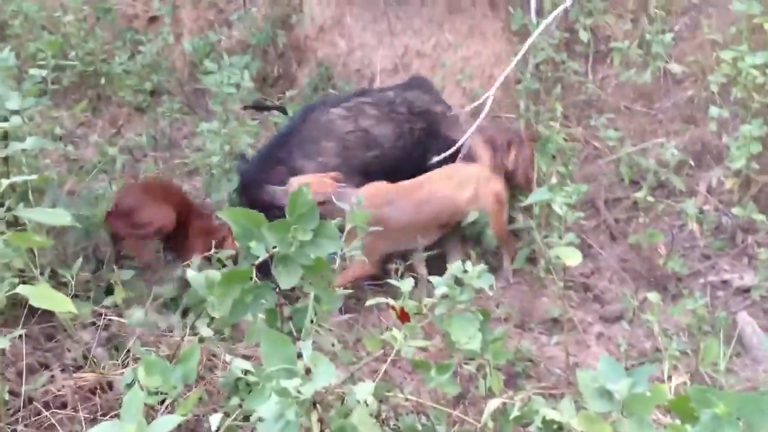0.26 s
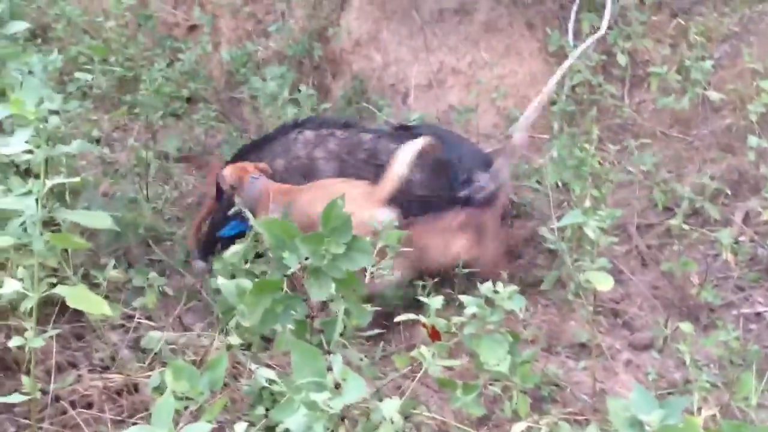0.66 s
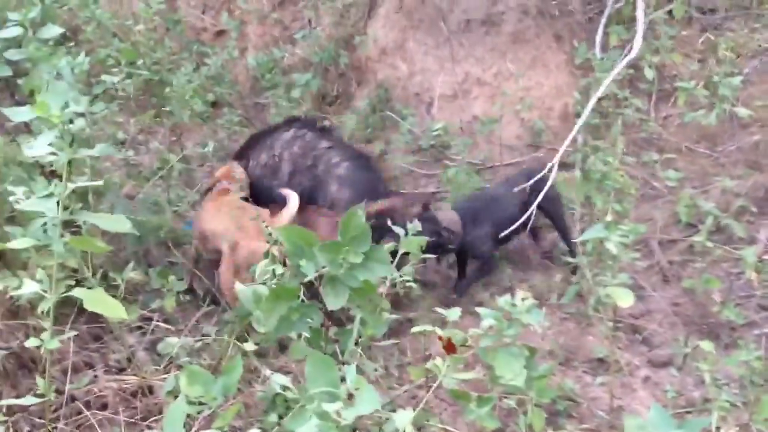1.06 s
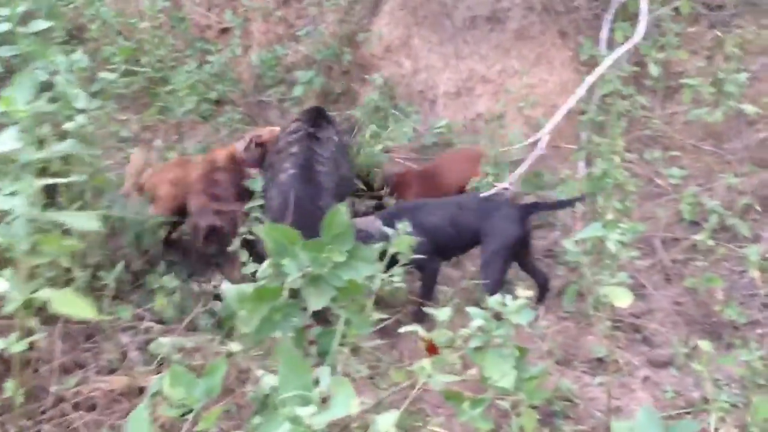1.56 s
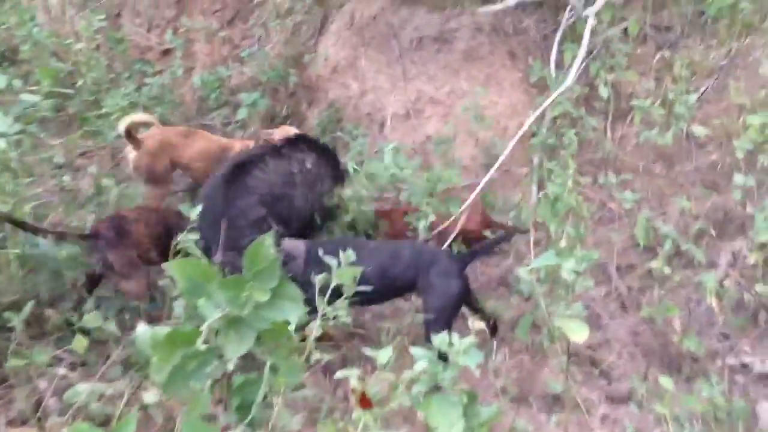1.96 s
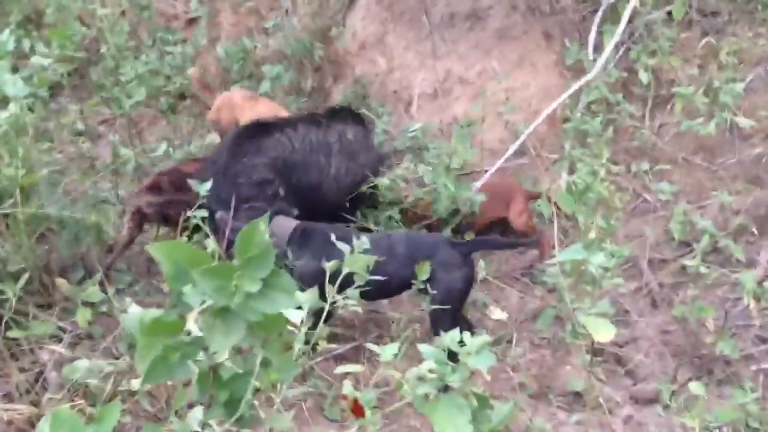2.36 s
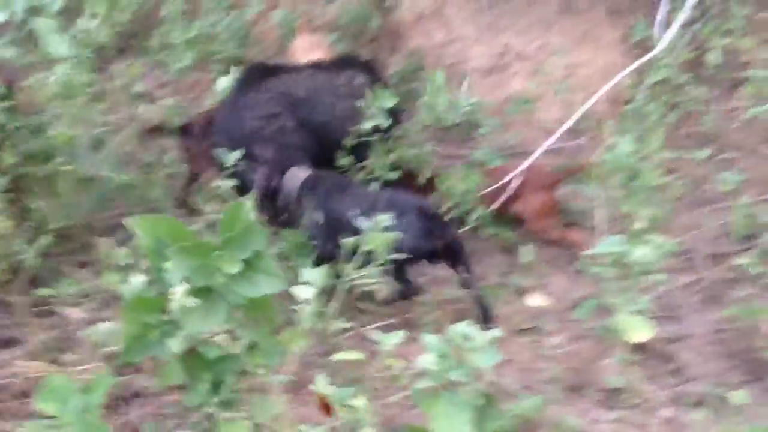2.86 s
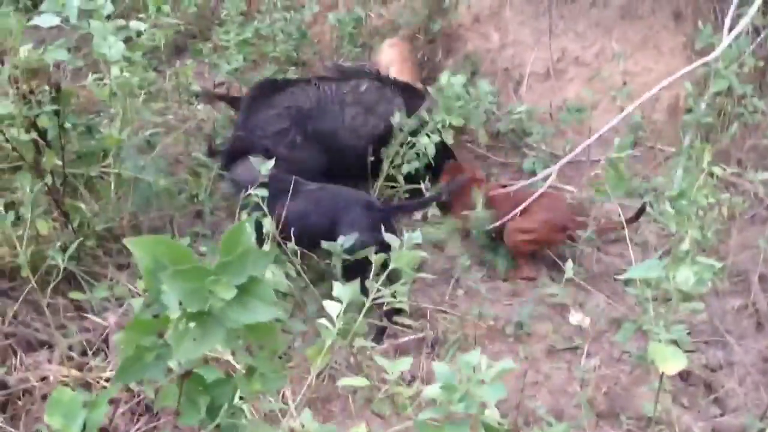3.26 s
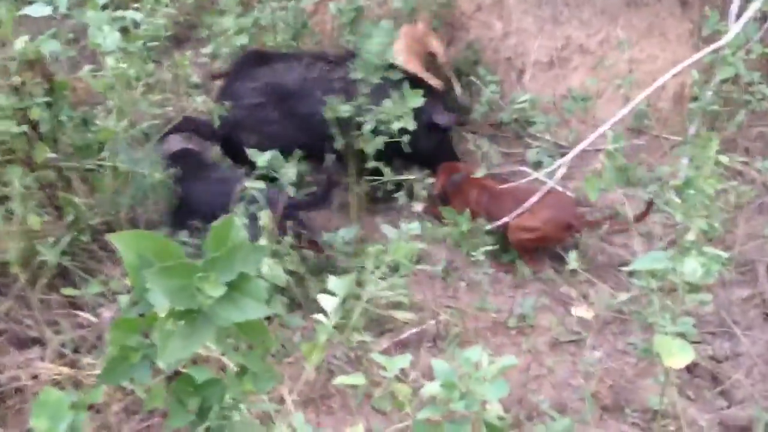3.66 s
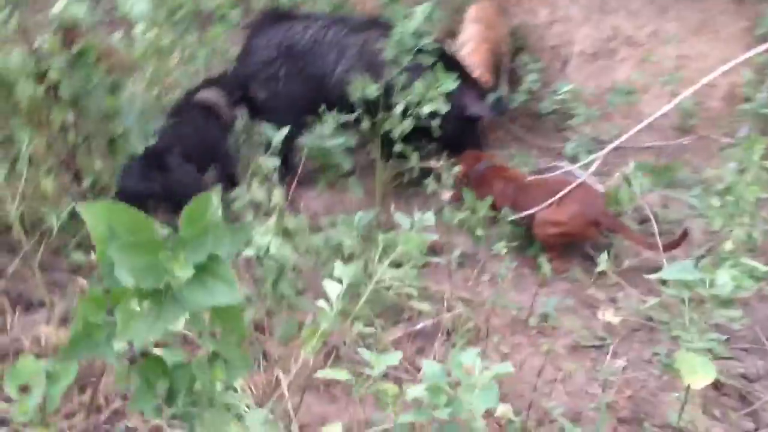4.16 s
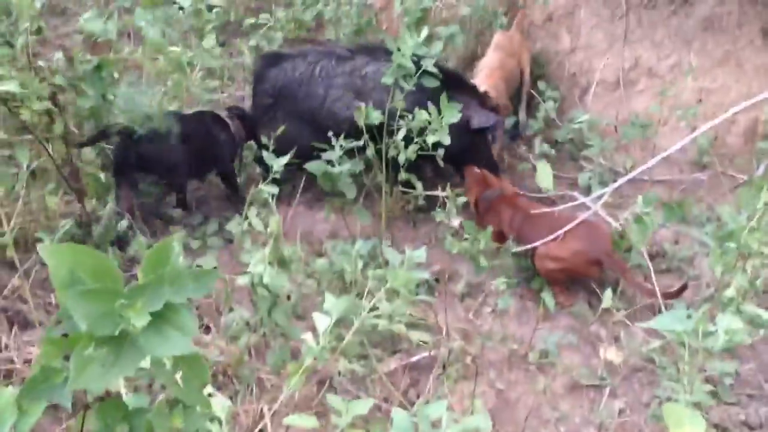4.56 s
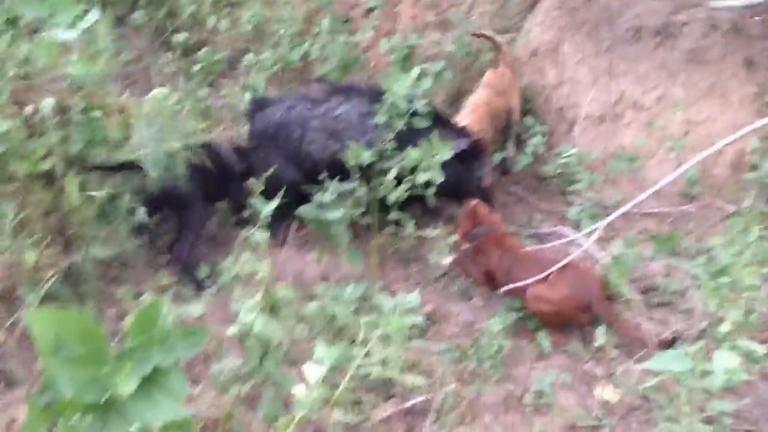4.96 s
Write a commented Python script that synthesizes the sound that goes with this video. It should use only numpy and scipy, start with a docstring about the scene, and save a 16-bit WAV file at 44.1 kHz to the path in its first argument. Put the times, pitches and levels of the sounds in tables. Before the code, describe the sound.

Outdoors, fairly close and dry: paws rustle and crackle through leaves over a soft hiss. A dog whines high and nearly pure, flickering and breaking up, strongest and longest early on, then thinning out. Short half-voiced huffs and toneless grumbles come from the struggle. Twigs crack, more sharply in the second half, before two rough, strained cries close the scene with only a faint echo.

```python
"""Dogs and a hog in dry brush

Hunting dogs hold a feral hog at bay a few metres away. A dog whines in thin cries, built from a gliding
whistle and its overtones. Huffs, grumbles and two late, hoarse cries are rough pulses and puffs of air
shaped by chest and throat. Paws shuffle through leaves and snap twigs, made from filtered noise and ticks,
over a quiet outdoor hiss. A faint echo follows the animals and the twigs."""
import sys
import numpy as np
from scipy import signal
from scipy.fft import rfft, irfft
from scipy.io import wavfile
from scipy.ndimage import uniform_filter1d

SR = 44100
rng = np.random.default_rng(int(sys.argv[2]) if len(sys.argv) > 2 else 0)


def unload_wav(signal):
    """Save mono or channel-first audio to the path in sys.argv[1] as 16-bit WAV at rate SR, clipped to [-1, 1]."""
    wavfile.write(
        sys.argv[1],
        SR,
        np.round(np.clip(np.atleast_2d(signal).T, -1, 1) * 32767).astype(np.int16),
    )


N = 229626
T = np.arange(N) / SR  # time of every sample, in seconds
TAPS = 4096  # length of the colouring filters, in samples
HZ = np.fft.rfftfreq(TAPS, 1 / SR)

# tone of a chest, shared by huffs, grumbles and cries: (frequency [Hz], level [dB])
CHEST = [(70, -38.5), (115, -10.5), (165, 2.5), (275, 3), (345, -12), (600, -57)]


def amp(db):
    """Turns decibels into a plain gain."""
    return 10 ** (np.asarray(db) / 20)


def unit(x):
    """Scales a sound to an average strength (rms) of 1."""
    return x / np.sqrt(np.mean(x ** 2) + 1e-20)


def noise():
    """White noise: a plain hiss with all pitches equally strong."""
    return rng.standard_normal(N)


def wander(rate_hz):
    """Smooth random drift, up to a given rate; rms 1."""
    lowpass = signal.butter(3, rate_hz, fs=SR, output="sos")
    return unit(signal.sosfilt(lowpass, noise()))


def shiver(rate_hz):
    """Quick random trembling around a rate, with no slow drift; rms 1."""
    band = signal.butter(2, [rate_hz / 2, rate_hz * 2], "bandpass", fs=SR, output="sos")
    return unit(signal.sosfilt(band, noise()))


def swell(start, length, rise, fall):
    """The loudness of one event: it rises, holds and dies away (all in seconds)."""
    before = np.minimum(T - start, 0)
    after = np.maximum(T - start - length, 0)
    return np.exp(-(before / rise) ** 2 - after / fall)


def follow(rows, fade=0.012):
    """Gives a gate over the time span of a table, then each further column as a curve."""
    times, *columns = np.transpose(rows)
    to_nearest_end = np.minimum(T - times[0], times[-1] - T)
    gate = np.clip(to_nearest_end / fade + .5, 0, 1)
    return [gate] + [np.interp(T, times, column) for column in columns]


def colour(x, points):
    """Resonances that give a sound a spectrum of (Hz, dB) points, with the least delay; rms 1."""
    hz, db = np.transpose(points)
    log_gain = np.log(amp(np.interp(np.log(HZ + 1), np.log(hz), db)))
    cepstrum = irfft(log_gain)
    # keeping one half of the cepstrum puts the filter's energy as early as possible
    taps = irfft(np.exp(rfft(2 * cepstrum * (np.arange(TAPS) < TAPS // 2))))
    return unit(signal.oaconvolve(x, unit(taps))[:N])


def resonate(x, hz, width):
    """One resonance with a gain of 1 at its centre, which may move along a curve."""
    turn = np.exp(2j * np.pi * np.cumsum(hz * np.ones(len(x))) / SR)
    r = np.exp(-np.pi * width / SR)
    # shift the centre down to zero, smooth, then shift back up
    smooth = signal.lfilter([1 - r], [1, -r], x / turn + 1e-18)
    return 2 * (turn * smooth).real


def formant(x, hz, width):
    """A steep throat resonance, made of three equal ones in a row; rms 1."""
    return unit(resonate(resonate(resonate(x, hz, width), hz, width), hz, width))


def folds(pitch_hz, rough, jitter, shimmer_db):
    """Uneven pulses of slack vocal folds, mixed with air that escapes in puffs each cycle."""
    rough = np.clip(rough, 0, 1)
    turns = np.cumsum(pitch_hz * (1 + jitter * rough * shiver(70))) / SR
    pulses = unit(np.diff(np.floor(turns), prepend=0) - pitch_hz / SR)
    puffs = unit((.3 + np.exp(-(turns % 1) / .35)) * noise())
    drive = ((1 - rough) * pulses + rough * puffs) * amp(shimmer_db * rough * shiver(95))
    return drive / np.sqrt(uniform_filter1d(drive ** 2, size=1100))  # steady air pressure over a few cycles


def leaves():
    """Trampled leaves: a soft wash with tiny crackles, swelling with each scuffle, under a steadier crisp hiss."""
    # scuffling paws: (start [s], length [s], level [dB])
    scuffles = [(0.095, 0.28, -49), (0.447, 0.28, -45), (0.772, 0.071, -41.5), (0.917, 0.27, -52),
                (1.525, 0.48, -48), (2.1, .12, -48.5), (2.38, 0.2, -47.5), (2.756, 0.085, -45.5),
                (3.053, 0.06, -53.5), (3.205, 0.11, -54), (3.45, 0.25, -49), (3.805, 0.089, -52),
                (4.188, 0.19, -51.5), (4.615, 0.16, -49.5), (5.063, 0.092, -47)]
    # tone of the trampled leaves: (frequency [Hz], level [dB])
    leaf_tone = [(120, -24.5), (200, -18), (330, -15), (500, -7), (1000, -12), (1350, -11), (1650, -3),
                 (2270, -6.5), (2700, -9), (3400, -10), (4800, -11), (6800, -19.5), (9500, -29),
                 (12400, -65.5)]
    # tone of the crisp treble: (frequency [Hz], level [dB])
    crisp_tone = [(5000, -36.5), (7500, -8.5), (10000, -3.5), (12500, -1), (15500, 0.5)]
    stir_db, stir_swing_db = -52, 1.47  # the brush never stops stirring
    crisp_db, crisp_swing_db = -59, 1.5
    ticks_per_s = 600
    power = amp(stir_db) ** 2
    for start, length, db in scuffles:
        power = power + (amp(db) * swell(start, length, rise=.035, fall=.045)) ** 2
    stir = np.sqrt(power) * amp(stir_swing_db * wander(17))
    tick_size = amp(3.5 * np.minimum(rng.exponential(1, N), 3.5))  # few are large
    ticks = np.sign(noise()) * (rng.random(N) < ticks_per_s / SR) * tick_size
    grain = rng.standard_normal(120) * np.exp(-np.arange(120) / 30)
    crackle = unit(signal.oaconvolve(ticks, grain)[:N])
    body = stir * colour(noise() + 0.14 * crackle, leaf_tone)
    crisp = colour(noise() + 0.33 * crackle, crisp_tone)
    return body + amp(crisp_db + crisp_swing_db * wander(8.9)) * crisp


def twigs():
    """Dry stems tick at random times: tiny bursts of noise, most of them small, in one wide band."""
    ticks_per_s, level_db, decay_s = 10, -69, .0012
    tick_size = amp(4 * np.minimum(rng.exponential(1, N), 3))
    ticks = (rng.random(N) < ticks_per_s / SR) * tick_size
    bursts = signal.lfilter([1], [1, -np.exp(-1 / (decay_s * SR))], ticks)
    return amp(level_db) * unit(resonate(bursts * noise(), 4500, 5000))


def snaps():
    """Twigs crack and paws land, each a brief burst of noise that dies away in its own band."""
    # snaps and thuds underfoot: (start [s], level [dB], centre [Hz], width [Hz], decay [s])
    cracks = [(.018, -38, 3480, 2500, 0.019), (0.46, -39, 4590, 5000, 0.003),
              (0.825, -41.5, 4000, 5000, 0.0029), (1.402, -39, 4470, 4000, 0.002),
              (1.794, -44, 7230, 8900, .002), (3.099, -45, 4000, 7000, 0.0091),
              (3.439, -37, 12100, 4420, 0.0071), (3.44, -41.5, 2980, 4120, 0.0055),
              (3.855, -51, 12600, 6060, 0.0037), (3.906, -46.5, 5780, 6940, 0.022),
              (3.923, -51, 8000, 5930, 0.0062), (3.934, -45, 390, 248, 0.023),
              (4.1, -38.5, 670, 720, 0.0031), (4.103, -44, 2820, 4940, 0.0038),
              (4.165, -31, 3500, 1980, 0.0042), (4.756, -35, 4300, 7210, 0.0031)]
    out = np.zeros(N + SR)
    t = np.arange(SR // 10) / SR
    for start, db, hz, width, decay in cracks:
        burst = rng.standard_normal(len(t))
        crack = unit(resonate(resonate(burst, hz, width), hz, width))
        out[round(start * SR):][:len(t)] += amp(db) * crack * np.exp(-t / decay)
    return out[:N]


def growl():
    """Low, nearly toneless grumbling: slack folds sound chest and throat in bouts over a faint growl."""
    # grumbles in the tussle: (start [s], length [s], chest level [dB], throat level [dB])
    grumbles = [(0.103, 0.15, -48.5, -55.5), (0.676, 0.034, -56, -75), (1.5, .06, -48, -67.5),
                (1.571, 0.04, -43.5, -45.5), (1.636, 0.034, -44.5, -39.5), (1.759, 0.1, -53.5, -77),
                (3.034, 0.035, -62, -48.5), (3.222, .18, -54.5, -57), (3.566, 0.13, -43.5, -53.5),
                (3.688, 0.14, -52, -53.5), (4.07, 0.024, -56, -63), (4.151, 0.074, -73, -53.5),
                (4.482, .02, -46, -65)]
    # tone of the growling throat: (frequency [Hz], level [dB])
    growl_tone = [(300, -23.5), (400, -12), (540, -2.5), (760, 1), (960, 6), (1250, -4.5), (1600, -18),
                  (3000, -61)]
    mutter_chest_db, mutter_throat_db, mutter_swing_db = -62.5, -62, -1.5
    chest = amp(mutter_chest_db + mutter_swing_db * wander(21))
    throat = amp(mutter_throat_db + mutter_swing_db * wander(10))
    for start, length, chest_db, throat_db in grumbles:
        bout = swell(start, length, rise=.015, fall=.018)
        chest = np.maximum(chest, amp(chest_db) * bout)
        throat = np.maximum(throat, amp(throat_db) * bout)
    drive = folds(105, rough=.7, jitter=.25, shimmer_db=3)
    return chest * colour(drive, CHEST) + throat * colour(drive, growl_tone)


def huffs():
    """Short, gruff, half-voiced puffs through chest and throat; the pitch sags through each one."""
    # the dog's huffs: (peak time [s], rise [s], decay [s], level [dB], throat against chest [dB],
    # pitch at the peak [Hz], roughness [0-1])
    puffs = np.array([(0.803, 0.01, 0.016, -33, -9.5, 144.5, 0.31),
                      (2.049, .011, 0.014, -34, -6, 142.1, 0.3),
                      (2.796, 0.0094, 0.016, -26.5, 2.5, 170.9, 0.17),
                      (3.575, 0.0051, 0.013, -34, -10, 263.3, 0), (3.651, 0.048, 0.028, -44, 0, 201.6, 0.5),
                      (3.741, 0.013, 0.054, -41, 4, 210, 0.5), (4.784, 0.024, 0.015, -49.5, 7, 207.7, 0.4)])
    # tone of the dog's throat: (frequency [Hz], level [dB])
    throat_tone = [(330, -50), (420, 1.5), (520, 9.5), (650, 0.5), (780, 4.5), (1000, -8.5), (1600, -15),
                   (2200, -11), (3000, -21.5), (5000, -20.5), (9000, -56.5), (14000, -70.5)]
    halfway = (puffs[1:, 0] + puffs[:-1, 0]) / 2
    nearest = np.searchsorted(halfway, T)  # each moment belongs to the nearest huff
    peak, rise, decay, db, throat_db, pitch_hz, rough = puffs[nearest].T
    sag = 1 - 3 * np.clip(T - peak, -.03, .03)
    drive = folds(pitch_hz * sag, rough, jitter=.2, shimmer_db=4)
    loudness = np.exp(-(np.minimum(T - peak, 0) / rise) ** 2 - np.maximum(T - peak, 0) / decay)
    voiced = colour(drive, CHEST) + amp(throat_db) * colour(drive, throat_tone)
    return amp(db) * loudness * voiced / np.hypot(1, amp(throat_db))


def harsh_cry(rows, top_hz, closed_hz, open_hz, third_start_hz, third_end_hz, third_db, rasp_db):
    """The voice grows rougher through the cry, while the mouth and third resonances glide."""
    # tone of the crying throat: (frequency [Hz], level [dB])
    cry_tone = [(280, -38), (350, -8), (410, 9), (520, 13.5), (640, 15), (800, 12), (1050, 0), (1400, 12),
                (2000, -41)]
    # upper throat resonances of the rasp: (average centre [Hz], width [Hz], level within the rasp [dB])
    rasp_bands = [(3670, 300, 7), (4220, 2500, 10), (4980, 340, 6), (5550, 710, -6)]
    pitch_arch = .2  # the pitch is lower by this share at both ends
    rough_start, rough_end = 0.43, 0.72
    mouth_opens_s = 0.083
    chest_db, chest_dip_db = -34.5, -8  # the chest tone dips in mid-cry
    rasp_late, rasp_ragged_db = 1.17, 1.5  # the rasp peaks a little late, and sputters
    rasp_drift = 0.086  # the upper throat resonances wander by this share
    gate, effort_db, mouth_db = follow(rows, fade=0.043)
    start, end = rows[0][0], rows[-1][0]
    u = np.clip((T - start) / (end - start), 0, 1)  # progress through the cry
    arch = np.sin(np.pi * u)
    late = abs(np.sin(np.pi * u ** rasp_late))
    pitch_hz = top_hz * (1 - pitch_arch + pitch_arch * np.sin(np.pi * u ** 0.66))
    drive = folds(pitch_hz, rough_start + (rough_end - rough_start) * u, jitter=.17, shimmer_db=3.5)
    opening = np.clip((T - start) / mouth_opens_s, 0, 1) ** 2
    mouth_hz = closed_hz + (open_hz - closed_hz) * opening
    third_hz = third_start_hz + (third_end_hz - third_start_hz) * u
    throat = amp(effort_db) * colour(drive, cry_tone)
    chest = amp(chest_db + chest_dip_db * arch ** 2) * colour(drive, CHEST)
    mouth = amp(mouth_db + 4.6) * formant(drive, mouth_hz, 310)
    third = amp(third_db) * arch * formant(drive, third_hz, 560)
    rasp = np.zeros(N)
    for hz, width, db in rasp_bands:
        rasp += amp(db) * formant(drive, hz * (1 + rasp_drift * wander(26)), width)
    rasp = amp(rasp_db + rasp_ragged_db * shiver(38)) * late * unit(rasp)
    return gate * (throat + chest + mouth + third + rasp)


def harsh_cries():
    """Two hoarse cries from the same throat, each with its own pitch and mouth shape."""
    # one list a cry: (time [s], effort [dB], mouth resonance before a boost of 4.6 dB [dB])
    cries = [
        [(4.493, -39, -51), (4.511, -24, -25.5), (4.523, -25, -25.5), (4.553, -23, -44), (4.585, -18.5, -27),
         (4.625, -28.5, -35), (4.645, -36, -66), (4.66, -36, -46)],
        [(5.022, -42, -49), (5.032, -30, -40), (5.046, -24.5, -35.5), (5.11, -19.5, -25), (5.134, -21.5, -28.5),
         (5.158, -26, -36.5), (5.174, -33, -49), (5.2, -42, -52)],
    ]
    # one row a cry: (top pitch [Hz], mouth resonance at the start [Hz], when open [Hz],
    # third resonance at the start [Hz], at the end [Hz], its peak level [dB], rasp peak level [dB])
    cry_voices = [(230.9, 903, 1120, 2410, 1700, -36, -41.5), (208.3, 1368, 1320, 2130, 2400, -46, -41.5)]
    return sum(harsh_cry(rows, *voice) for rows, voice in zip(cries, cry_voices))


def squeaks():
    """Brief whistles far above the whine, each bending through three pitches with a slight waver."""
    # thin squeaks: (start [s], length [s], start pitch [Hz], middle pitch [Hz], end pitch [Hz], level [dB])
    thin_whistles = [(3.112, 0.033, 4450, 4360, 4100, -49), (4.037, 0.017, 4230, 4127, 4080, -36.5),
                     (4.056, 0.025, 7950, 8000, 8400, -53.5)]
    out = np.zeros(N)
    for start, length, start_hz, middle_hz, end_hz, db in thin_whistles:
        u = np.clip((T - start) / length, 0, 1)
        hz = np.interp(u, [0, .5, 1], [start_hz, middle_hz, end_hz]) * (1 + 0.0105 * wander(430))
        out += amp(db) * np.sin(np.pi * u) * np.sin(2 * np.pi * np.cumsum(hz) / SR)
    return np.sqrt(2) * out


def whines():
    """A nearly pure whistle that turns rough when it is weak, slides fast or ends; the overtones flicker."""
    # one list a whine: (time [s], pitch [Hz], whistle level [dB], level of its octave [dB])
    whine_curves = [
        [(0.12, 1650, -18.5, -39.5), (0.136, 1382, -21, -36), (0.158, 1430, -16, -36),
         (0.172, 1426, -18.5, -43), (0.222, 1446, -30, -45), (0.232, 1523, -30.5, -37),
         (0.248, 1650, -29.5, -54), (0.269, 1820, -25.5, -72)],
        [(0.298, 1668, -25, -42.5), (0.32, 1491, -29, -33), (0.35, 1520, -37, -32.5), (0.362, 1559, -23, -32.5),
         (0.404, 1550, -37.5, -36.5), (0.43, 1562, -36, -61)],
        [(0.461, 1633, -24, -30), (0.467, 1600, -27, -30), (0.481, 1435, -45, -43.5), (0.507, 1565, -31.5, -24),
         (0.559, 1499, -39, -31.5), (0.583, 1573, -26.5, -23), (0.599, 1665, -18, -24.5),
         (0.643, 1748, -24.5, -27), (0.685, 1743, -21, -30.5), (0.719, 1700, -22.5, -61),
         (0.753, 1738, -27.5, -49), (0.775, 1669, -34, -56)],
        [(1.327, 1740, -27, -69), (1.333, 1750, -20, -70), (1.361, 1491, -45.5, -57), (1.377, 1432, -52.5, -44),
         (1.409, 1633, -29.5, -70), (1.419, 1643, -38, -76)],
        [(1.477, 1770, -21.5, -53.5), (1.489, 1774, -18, -60.5), (1.501, 1837, -24.5, -54)],
        [(1.509, 1791, -18.5, -49), (1.515, 1862, -23, -49), (1.547, 1671, -28.5, -35),
         (1.599, 1707, -16, -41.5), (1.665, 1725, -10.5, -50.5), (1.705, 1735, -21, -47),
         (1.715, 1734, -16, -41), (1.775, 1731, -8.5, -39), (1.801, 1787, -14, -38), (1.845, 1662, -14.5, -42),
         (1.875, 1724, -20.5, -25.5), (1.903, 1745, -14.5, -43), (1.921, 1666, -12, -31.5),
         (1.949, 1712, -23, -57), (1.957, 1845, -16.5, -41), (1.971, 1762, -12, -49),
         (1.987, 1695, -19.5, -28.5), (2.009, 1689, -20, -32), (2.023, 1744, -30, -50.5),
         (2.034, 1684, -26, -37)],
        [(2.398, 1848, -34, -26), (2.418, 1806, -27.5, -25), (2.44, 1810, -52, -32),
         (2.468, 1816, -19.5, -44.5), (2.53, 1788, -21.5, -26), (2.576, 1806, -21.5, -37),
         (2.6, 1815, -19.5, -32), (2.642, 1771, -20, -52.5), (2.67, 1798, -19, -40.5),
         (2.744, 1818, -18.5, -42.5), (2.775, 1700, -31, -38.5)],
        [(3.174, 1542, -32, -55), (3.184, 1520, -25, -37.5), (3.222, 1582, -22.5, -42.5),
         (3.236, 1580, -28.5, -51)],
        [(3.487, 1477, -28.5, -36), (3.495, 1473, -31, -41.5), (3.539, 1462, -26, -41), (3.558, 1358, -24, -43)],
    ]
    # one row a whine: (third harmonic [dB], fourth harmonic [dB], roughness at the end [0-1],
    # unsteadiness [0-1]); the harmonic levels hold at the usual whistle and octave levels below
    whine_voices = [(-49.5, -49.5, 1, 0.8), (-50.5, -63, 0.3, 1), (-45.5, -54.5, 0.1, 0.73),
                    (-57.5, -59, 0.2, .5), (-65.5, -71.5, .05, .3), (-48, -56, .5, 0.78),
                    (-44.5, -59.5, 0.1, 0.38), (-55, -62, 0.2, 0.15), (-68, -52, 0.14, 0.8)]
    # fifth to seventh harmonics against the mean of the third and fourth: (frequency [Hz], level [dB])
    overtones = [(6800, -11), (7800, -32), (9000, -12.5), (10300, -21.5), (13000, -30)]
    steady_db, breakup_db = -25, 30.5  # clean above this level, fully rough this far below it
    glide_hz_per_s = 82000  # a glide this fast makes it fully rough
    break_s = 0.029  # a whine breaks up over its last moments
    wobble, flutter_db, flicker_db = 0.0049, 2.04, 4  # unsteadiness of pitch, whistle and overtones
    dropout_db, dropout_hz = 4, 18  # the upper harmonics also come and go more slowly
    usual_whistle_db, usual_octave_db = -23.5, -31.5
    third_follows_whistle, upper_follows_octave = 0.52, 0.49  # shares of the swings they follow

    gates = np.array([follow([row[:1] for row in rows], fade=0.008)[0] for rows in whine_curves])
    current = gates.argmax(axis=0)  # which whine sounds at each moment
    third_db, fourth_db, end_rough, unsteady = np.transpose(whine_voices)[:, current]
    _, hz, whistle_db, octave_db = follow(np.vstack(whine_curves))

    weak = np.clip((steady_db - np.maximum(whistle_db, octave_db)) / breakup_db, 0, 1)
    glide = uniform_filter1d(abs(np.gradient(hz)) * SR, size=400) / glide_hz_per_s
    left_s = np.array([rows[-1][0] for rows in whine_curves])[current] - T
    rough = np.clip(weak + glide + end_rough * np.exp(-(left_s / break_s) ** 2), 0, 1)
    jitter = rough * (.011 * shiver(110) + .006 * shiver(450))
    phase = 2 * np.pi * np.cumsum(hz * (1 + wobble * unsteady * shiver(29) + jitter)) / SR

    bright_db = upper_follows_octave * (octave_db - usual_octave_db)
    push_db = third_follows_whistle * (whistle_db - usual_whistle_db)
    third_db = third_db + bright_db + push_db + dropout_db * unsteady * wander(dropout_hz)
    fourth_db = fourth_db + bright_db + dropout_db * unsteady * wander(dropout_hz)
    voice = np.zeros(N)
    for count, db in enumerate([whistle_db, octave_db, third_db, fourth_db], 1):
        depth_db = np.interp(count, [1, 5], [flutter_db, flicker_db])  # higher harmonics flicker more
        unsteady_db = unsteady * depth_db * shiver(30)
        tremble_db = 3 * rough * shiver(120)
        voice += amp(db + unsteady_db + tremble_db) * np.sin(count * phase)
    for count in range(5, 8):
        db = np.interp(count * hz, *np.transpose(overtones))
        voice += amp((third_db + fourth_db) / 2 + db + 4 * wander(25)) * np.sin(count * phase)
    smooth_gate = np.sin(gates.sum(axis=0) * np.pi / 2) ** 2
    return np.sqrt(2) * smooth_gate * voice


def brush(x, t60):
    """Stems and trunks scatter the sound into sparse echoes that fall by 60 dB in t60 seconds."""
    t = np.arange(SR) / SR
    hits = (rng.random(len(t)) < 2000 / SR) * (t > .008)
    taps = rng.standard_normal(len(t)) * hits * amp(-60 * t / t60)
    return signal.fftconvolve(x, taps / np.linalg.norm(taps))[:N]


def scene():
    """The animals and the brush they trample, with a faint, long echo from the woods."""
    near = twigs() + snaps() + growl() + huffs() + harsh_cries() + squeaks() + whines()
    echo = amp(-29) * brush(near, t60=.3) + amp(-33) * brush(near, t60=1.3)
    return (leaves() + near + echo)[None]


def record(dry):
    """The microphone sheds the deep bass; then a steep filter removes the highest treble."""
    edge_hz = 15500
    thin = signal.sosfilt(signal.butter(2, 90, "highpass", fs=SR, output="sos"), dry)
    band_limit = signal.firwin(511, edge_hz, window=("kaiser", 9), fs=SR)
    return signal.oaconvolve(thin, band_limit[None], "same")


dry = scene()
out = record(dry)
unload_wav(out)
```